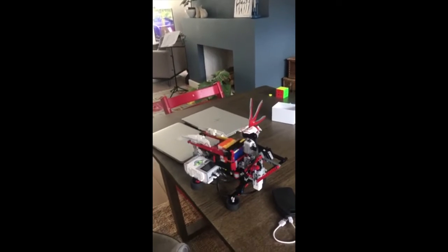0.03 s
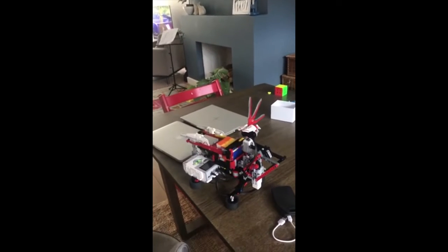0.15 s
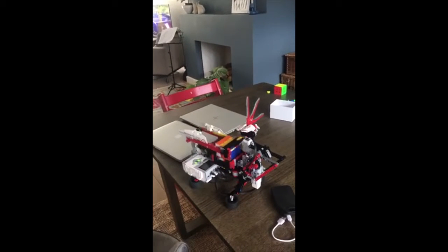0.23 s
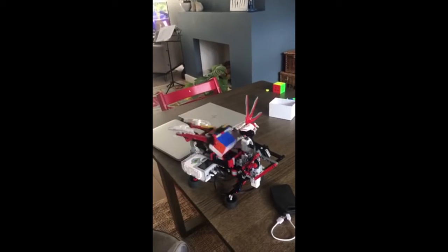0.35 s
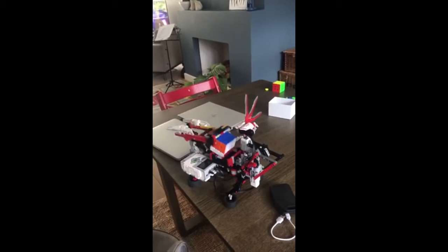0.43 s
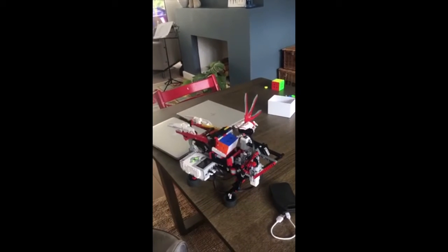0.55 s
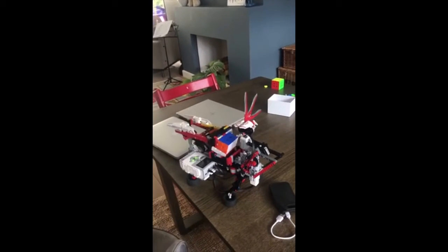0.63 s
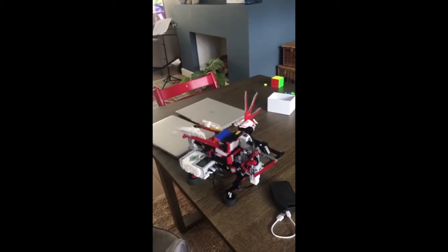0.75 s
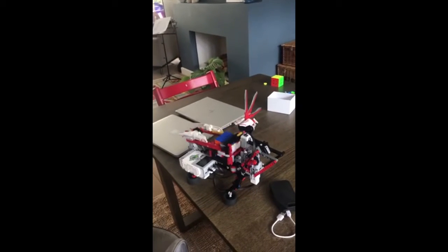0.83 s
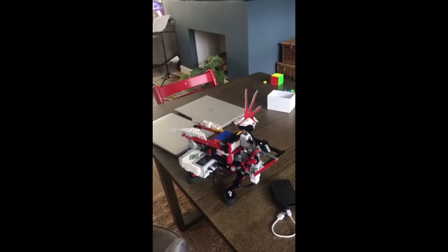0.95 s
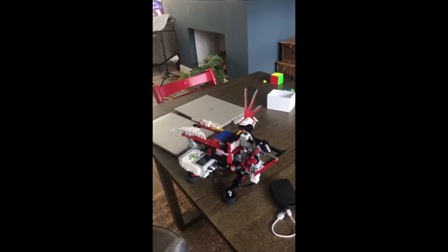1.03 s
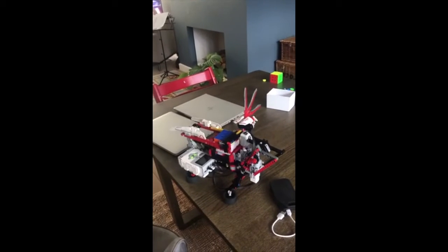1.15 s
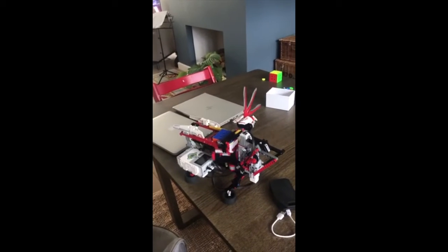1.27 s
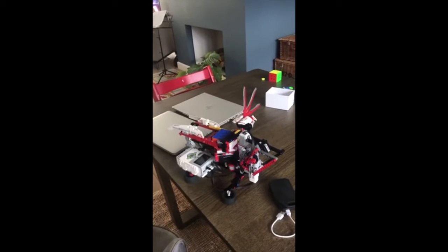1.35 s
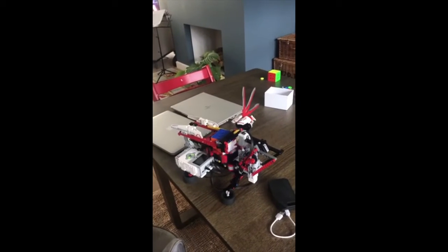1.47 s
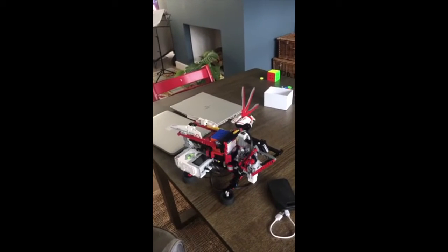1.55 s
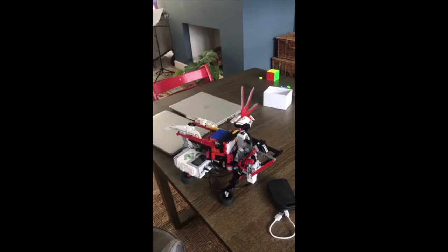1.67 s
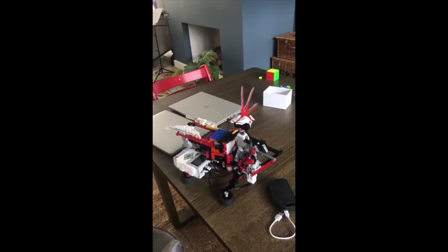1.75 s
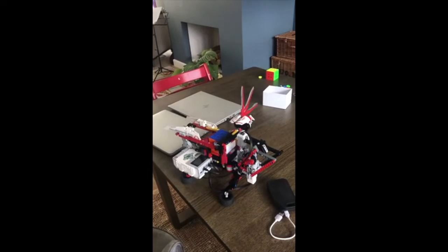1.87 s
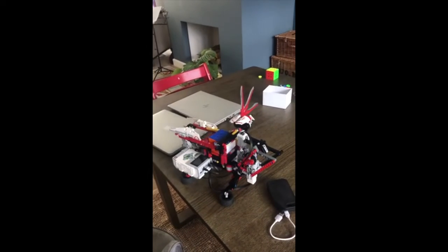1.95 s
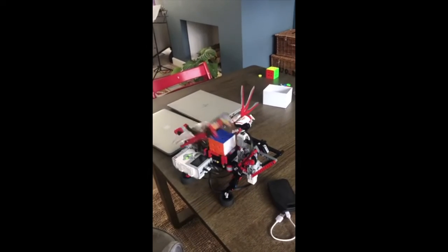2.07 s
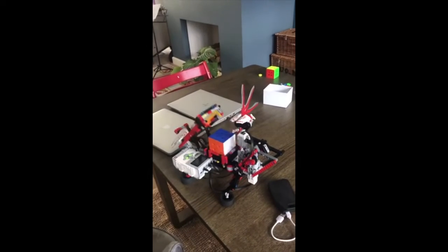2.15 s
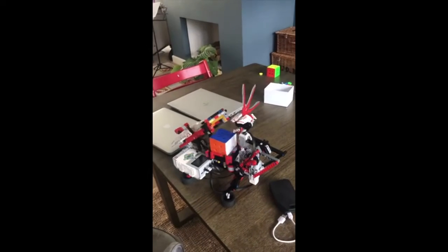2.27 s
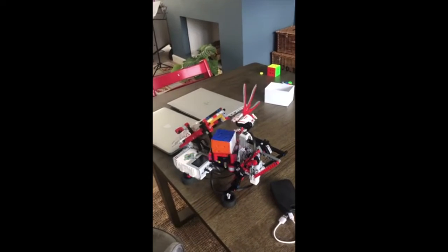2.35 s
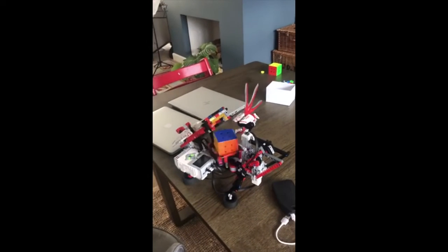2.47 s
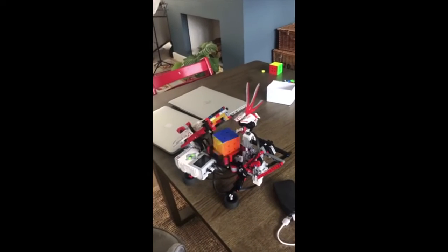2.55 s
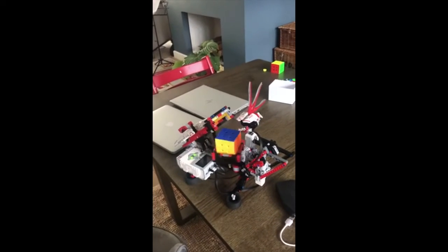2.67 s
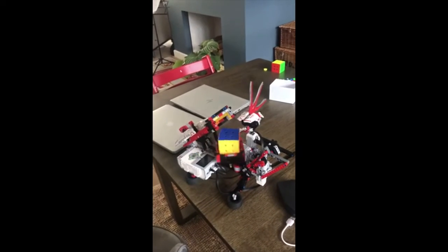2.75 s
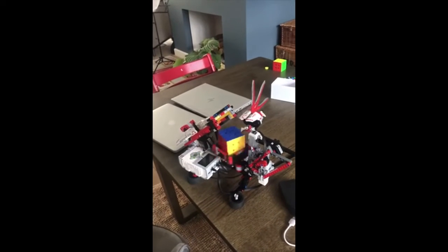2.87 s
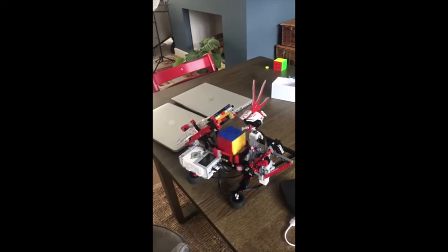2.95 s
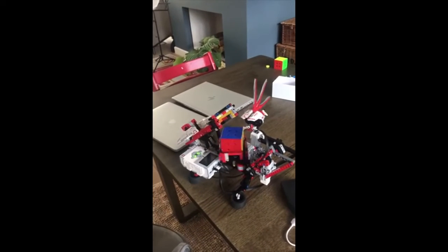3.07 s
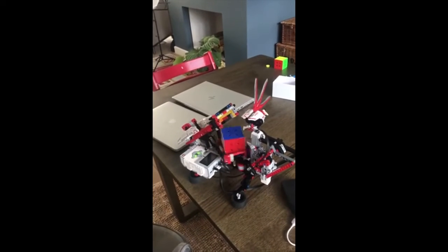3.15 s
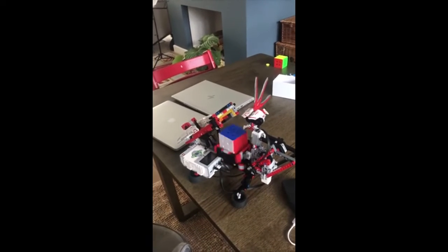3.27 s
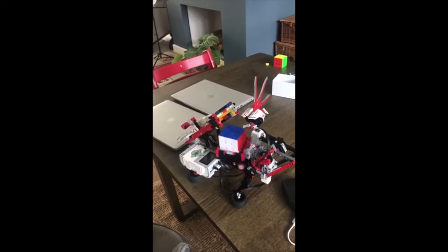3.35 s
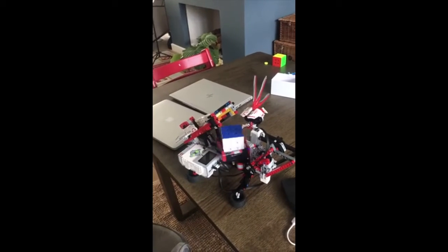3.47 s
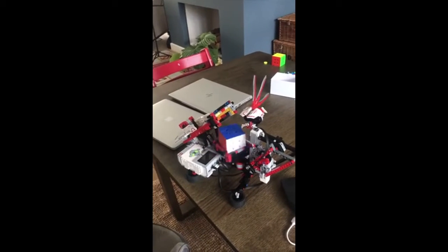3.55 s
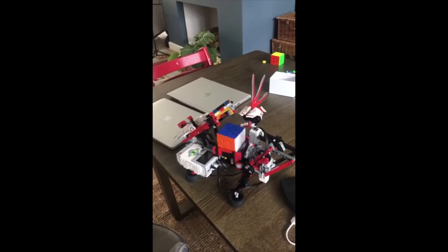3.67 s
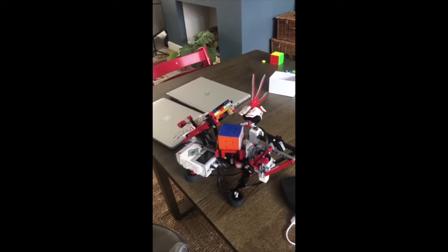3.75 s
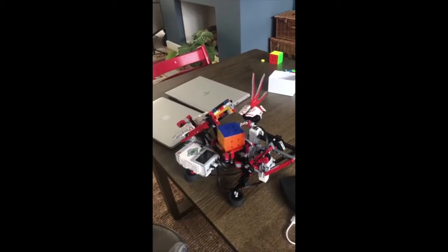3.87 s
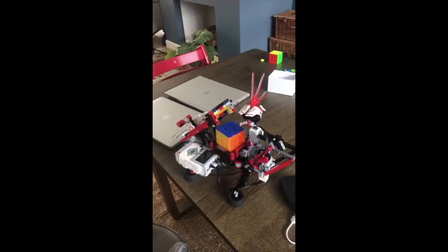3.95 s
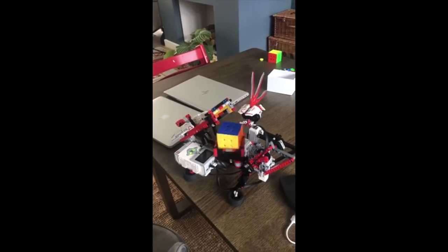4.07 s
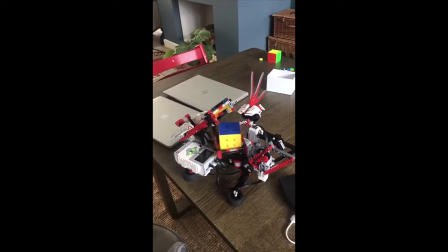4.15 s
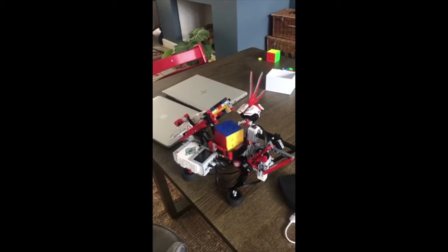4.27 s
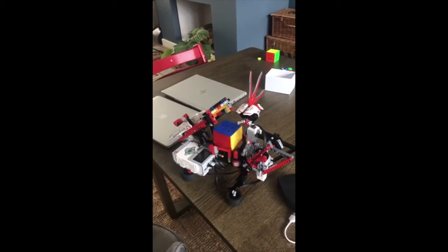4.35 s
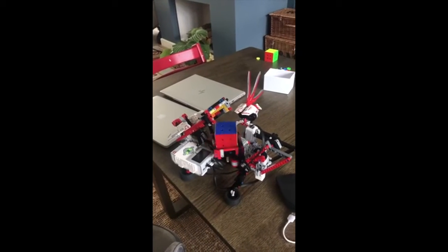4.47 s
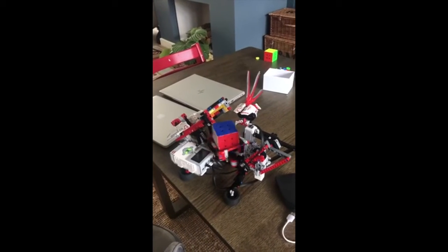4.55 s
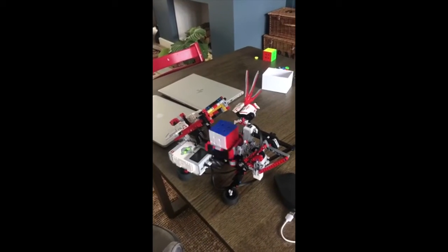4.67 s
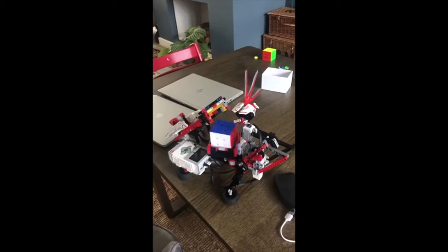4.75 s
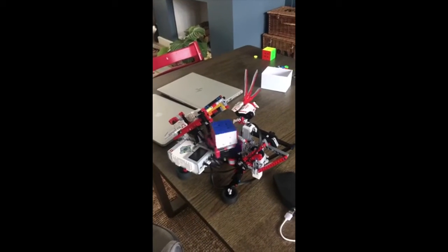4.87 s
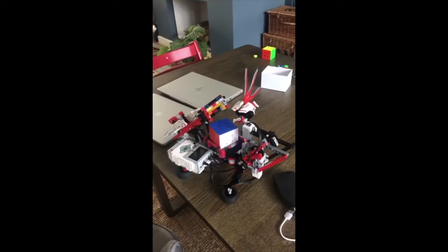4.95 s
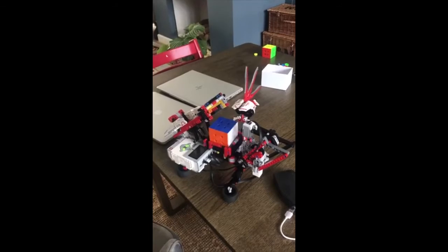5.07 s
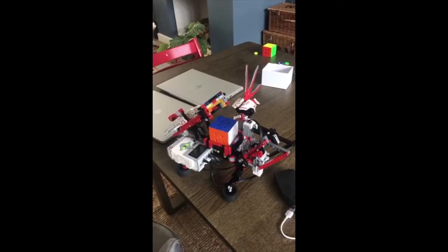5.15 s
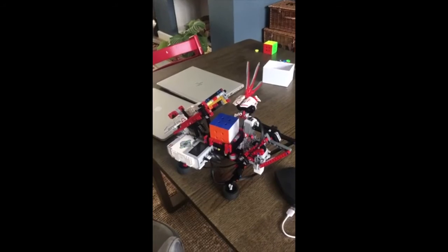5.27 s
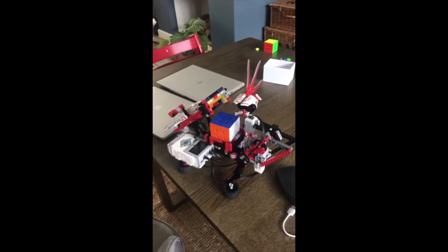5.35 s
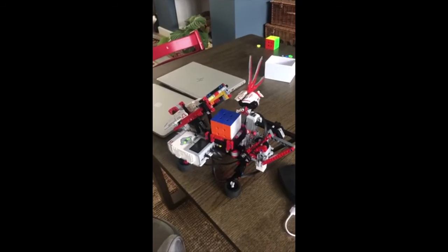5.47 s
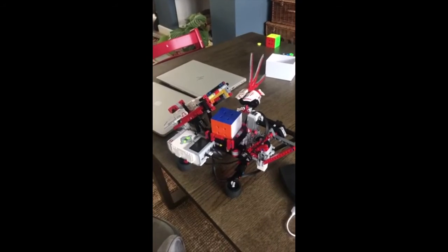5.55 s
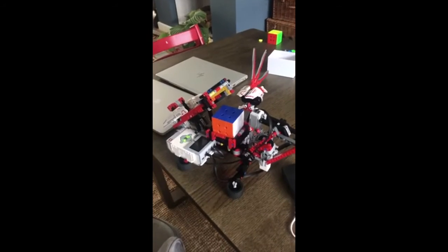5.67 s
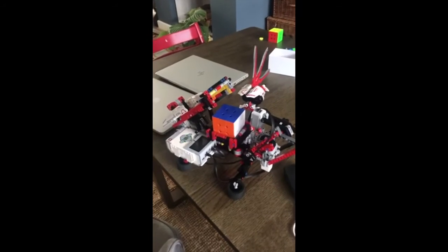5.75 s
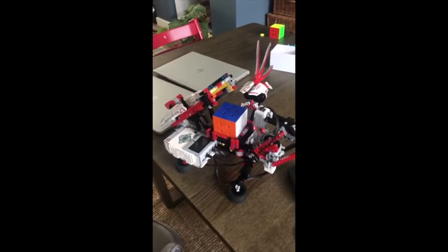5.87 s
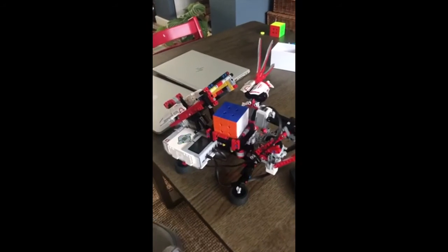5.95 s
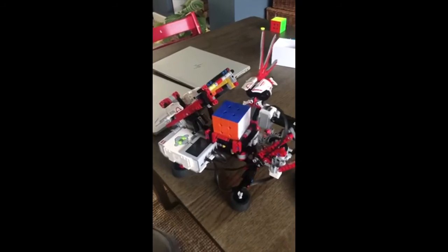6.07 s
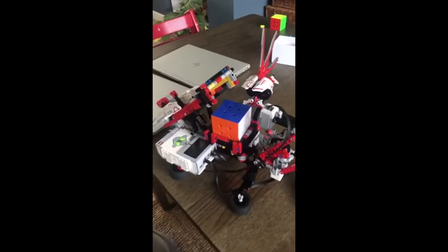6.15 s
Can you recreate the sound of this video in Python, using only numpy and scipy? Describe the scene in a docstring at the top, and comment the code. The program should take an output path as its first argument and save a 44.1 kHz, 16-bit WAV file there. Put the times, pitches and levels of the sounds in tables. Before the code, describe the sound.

Small geared motors grind and whine in bursts as plastic parts clack and rattle on a wooden table, then one steady whirring spin stops abruptly.

```python
"""Grinding arm strokes, plastic clicks and a booming table top open the scene, in which a small plastic
robot on a wooden table turns and flips a puzzle cube. A geared turntable motor then runs twice, first briefly
and then long: harmonics of its tooth rate and of its shaft rate sound over filtered grinding noise.
Clicks, knocks and rattles are decaying modes of plastic bodies, table booms are narrow noise bands under
jolt envelopes, and a quiet living room adds a diffuse echo and faint air noise."""
import sys
import numpy as np
from scipy import signal
from scipy.fft import rfft, irfft
from scipy.io import wavfile
from scipy.ndimage import uniform_filter1d

SR = 44100
rng = np.random.default_rng(int(sys.argv[2]) if len(sys.argv) > 2 else 0)


def inscribe(sig):
    """Save sig as 16-bit PCM at rate SR to the path in sys.argv[1].

    A 1-D sig is mono; a 2-D sig holds one channel per row.
    Samples are clipped to [-1, 1] before scaling.
    """
    pcm = np.round(np.clip(np.atleast_2d(sig).T, -1, 1) * 32767)
    wavfile.write(sys.argv[1], SR, pcm.astype(np.int16))


N = 274302
T = np.arange(N) / SR  # time in s

# Spectrum of the room air. Each row: frequency in Hz, relative level in dB.
ROOM_AIR = [(15, -34), (25, -4), (63, -1), (200, -8.5), (234, -9), (280, -8.5), (362, -10.5), (560, -17.5),
            (653, -15.5), (802, -16), (1450, -20.5), (1600, -22), (11600, -31.5), (15100, -67),
            (22000, -120)]
ROOM_AIR_DB = -68
# Echo: time to lose 60 dB, and level against the sound that feeds it.
ROOM_T60_S, ROOM_DB = 0.54, -6.5
TOP_HZ = 11690  # upper edge of the microphone

# Low and high mode of the table top. Each row: frequency in Hz, bandwidth in Hz.
TABLE_MODES = [(59, 20), (118, 16)]
# Jolts of the frame on the table. Each row: time in s, level of the low mode in dB, of the high mode in dB.
JOLTS = [(0.0, -36, -35), (0.045, -39, -36), (0.16, -40.5, -45.5), (0.29, -49, -55), (0.43, -60, -49.5),
         (0.59, -51, -53), (0.74, -53.5, -63), (0.86, -55.5, -52), (0.92, -64, -52), (0.99, -59, -48.5),
         (1.08, -52, -58.5), (1.2, -68, -58), (1.31, -66, -58.5), (2.01, -60, -63), (2.15, -68, -56),
         (2.28, -59, -55), (2.421, -57, -47), (2.57, -62, -57.5), (2.88, -58.5, -75), (3.81, -61.5, -65),
         (4.07, -64, -76)]
JOLT_RISE_DB_S, JOLT_FALL_DB_S = 237, 109
# Faint steady shaking: level of the low mode in dB, of the high mode in dB.
TREMBLE_DB = (-71, -77)
TREMBLE_ENDS_S, TREMBLE_FADE_DB_S = 4.46, 16
# Lowest ring of the frame: frequency in Hz, level in dB.
FRAME_MODE = (168.6, 8.5)
# Loose parts: mean ticks per s, level in dB at 0 dB of shaking, dB gained per dB of shaking.
RATTLE_PER_S, RATTLE_DB, RATTLE_SLOPE = 160., -24, 0.69

# The cube drops and rocks in its cradle. Each row: time in s, peak in dB, frequency of the blow's
# own extra ring in Hz, its level in dB, brightness in dB per octave.
KNOCKS = [(0.099, -42, 1440, -8, -2), (0.189, -50, 363, 17, -8), (0.321, -51, 1370, 5, 8),
          (0.498, -42.5, 1450, 5, 0.5), (0.601, -36, 1260, 3, 26), (0.821, -48, 312, 5, -2),
          (0.899, -39.5, 1284, -2, 6), (0.984, -35.5, 307, -20, -5), (1.077, -41, 798, 18, 2),
          (1.134, -37.5, 750, 16, -3), (1.155, -44, 797, 12, -2), (2.259, -47, 300, -3, -2),
          (2.34, -44, 1550, 9, 0.5), (2.899, -47.5, 1300, 9, 5), (5.883, -58.5, 330, 10, -14)]
# Modes of the cradle. Each row: frequency in Hz, relative level in dB.
CRADLE_MODES = [(240, -11.5), (310, 2.5), (420, 0), (560, 4.5), (760, -10.5), (960, 7.5), (1200, -1),
                (1450, -19)]
# Plastic striking plastic. Each row: time in s, peak in dB, frequency of the blow's own extra ring in Hz,
# its level in dB, brightness in dB per octave.
CLICKS = [(0.0324, -23, 5800, -2.5, 5), (0.053, -23, 6800, -2, 3), (0.0644, -27, 5280, -4, 10),
          (0.0775, -18.5, 6200, -13, 22), (0.09, -22, 5270, 7, 3), (0.1202, -32, 5170, 0, 0),
          (0.1825, -35.5, 2030, -7, -9), (0.3182, -28.5, 3840, -9, 11), (0.3522, -19.5, 3050, -1, -3.5),
          (0.419, -31, 3150, -1.5, 7), (0.4754, -38, 1600, -2.5, -4), (0.4898, -30.5, 4497, -4, -17),
          (0.5397, -21.5, 4000, -12, -2), (0.6778, -40.5, 3300, 0, -2), (0.838, -18, 2940, -3, 0),
          (0.8436, -20, 6040, 8, 9), (0.8946, -24, 5730, -0.5, 10), (0.8985, -21, 5330, 2, 1),
          (0.9015, -19.5, 5300, 1, -2), (0.9205, -34.5, 1952, 6, -16), (0.9791, -33, 1780, -10, 3),
          (1.0136, -37, 3130, 2, -10), (1.8473, -36, 4470, 9, 6), (1.8696, -42, 4600, 3, 3),
          (1.8871, -41, 6050, 1, 5), (2.094, -25, 4720, 5, 7), (2.3479, -19.5, 6360, 25, 32.5),
          (5.2008, -50, 3100, 2, -4), (5.3345, -60, 4300, 0, -5), (5.3714, -51, 3780, 6, -15),
          (5.776, -53.5, 6700, 21, 13)]
# Modes of the plastic parts. Each row: frequency in Hz, relative level in dB.
PLASTIC_MODES = [(1800, -21), (2300, -15.5), (2800, -7), (3500, -2), (4300, 0), (5000, -14), (5700, 8),
                 (6500, 0), (7600, -5.5), (9000, -4), (10500, -15)]
PLASTIC_CYCLES, CRADLE_CYCLES = 32, 13  # cycles until a ring has lost 60 dB
CLICK_CHATTER_S, KNOCK_CHATTER_S = 0.0012, 0.0042  # decay constants of the contact

# Arm motor strokes and nudges. Each row: start in s, hold in s, grind level in dB, its slope in dB per s,
# treble in dB and body in dB against the middle of the grind.
ARM_STROKES = [(-0.05, 0.094, -48.5, -2, 1.5, 3), (0.018, 0.1, -45, -40, 4.5, -1.5),
               (0.11, 0.08, -54, -10, -10, -1.5), (0.21, 0.12, -53, 0, -6, -10),
               (0.287, 0.15, -45, -10, -3.5, -13), (0.425, 0.09, -47, -17, -5, -8.5),
               (0.551, 0.05, -57, 0, 1.5, 3.5), (0.633, 0.068, -58, 5, -2.5, -7),
               (0.711, 0.13, -51.5, -2, 1.5, -4), (0.836, 0.074, -52, -22, 4, 0.5),
               (0.951, 0.066, -49.5, 2, -2, -7.5), (1.045, 0.16, -63, -10, 2, 0),
               (1.83, 0.11, -52, -10, 2.5, -5.5), (2.031, 0.16, -49.5, 9.5, -1, -12.5),
               (2.199, 0.075, -57, -52, -4, 0)]
# The arm motor sings under load. Each row: start in s, duration in s, initial tooth rate in Hz,
# tooth rate approached in Hz, levels in dB of five tooth-rate multiples.
ARM_WHINE = [(-0.01, 0.1, 692, 771.5, -57, -72, -57, -57, -66),
             (0.323, 0.087, 688, 822, -53.5, -52, -45.5, -51, -52),
             (0.423, 0.063, 795, 798, -55, -62, -66, -68, -66),
             (0.742, 0.04, 791, 731.3, -55, -61, -60, -66, -55),
             (1.886, 0.067, 724.3, 866, -55, -52, -71, -58, -72),
             (2.085, 0.05, 699, 806, -54, -61, -60, -66, -73),
             (2.128, 0.045, 788, 805.5, -51, -65, -46, -58, -58),
             (2.188, 0.061, 805, 805, -57.5, -74, -62, -68, -61)]
# The five multiples of the arm's tooth rate.
ARM_MULTIPLE = [2, 3, 4, 5, 7]
# Grind filter of the arm. Each row: frequency in Hz, relative level in dB.
ARM_CASE = [(120, -18), (200, -8.5), (454, -19), (660, -12.5), (1080, -12.5), (1580, -2.5), (1810, -2),
            (2370, -5), (2720, -6), (3230, 0), (3640, 0.5), (5570, -5), (7700, -12.5), (11200, -17.5),
            (11800, -13.5), (15300, -53), (22000, -120)]
ARM_ATTACK_S, ARM_RELEASE_DB_S = 0.047, 279
WHINE_ATTACK_S, WHINE_RELEASE_DB_S = 0.0055, 500
ARM_SPIN_S = 0.055  # time constant with which the rate nears its goal

TEETH = 10  # pinion teeth per shaft turn
# Turntable motor, one list a run. Each row: time in s, tooth rate in Hz, grind in dB before a fixed trim,
# treble in dB against the middle of the grind, whine in dB added to the tooth-rate multiples.
TURNTABLE = [
    [(1.19, 571.6, -67, -6, -25), (1.215, 588, -46.5, -19, -15), (1.25, 671, -51, 3, -14),
     (1.266, 731, -48.5, -2, 0.5), (1.296, 751, -45, -4, -3), (1.328, 855, -52.5, 3, 0.5),
     (1.36, 902, -47.5, 1, 0.5), (1.4, 952, -47, 1.5, 1), (1.464, 992, -47, -2.5, 0.5),
     (1.53, 1004, -46.5, -0.5, 0), (1.6, 1012, -47.5, 0, 0.5), (1.642, 1010, -48, -2.5, 2),
     (1.655, 933, -42, -9, -14), (1.685, 735, -50, -6, -16), (1.76, 690, -69, -7, -40)],
    [(2.31, 724, -57.5, -10, -23), (2.348, 738, -46, -2, -9), (2.372, 768, -46.5, 1, -6),
     (2.392, 833, -45.5, -1, -2), (2.42, 900.2, -50, 3, -3), (2.44, 934, -50, 6, -9),
     (2.47, 970, -50, 6, -1), (2.53, 1010, -48.5, 5, 2), (2.63, 1038, -49.5, 6.5, 1.5),
     (2.8, 1042, -48, 5, 2), (3.0, 1046, -48, 5, -0.5), (4.0, 1046, -48.5, 5, 0.5),
     (5.06, 1046, -48, 5.5, 1), (5.072, 1013, -48, 1, -5), (5.092, 765, -48, -1, 0),
     (5.11, 752, -54, -6, -30), (5.16, 700, -60.5, -5, -41)],
]
# Grind filter of the turntable. Each row: frequency in Hz, relative level in dB.
TURNTABLE_CASE = [(120, -42), (200, -30), (867, -26), (1050, -18), (1220, -26), (1330, -17), (1930, -16),
                  (2040, -6.5), (2630, -9), (3070, -3), (3400, -2.5), (4170, 1.5), (5380, -3), (6380, -5.5),
                  (11800, -10), (15300, -29), (22000, -120)]
# Resonant humps of that filter. Each row: centre in Hz, width in Hz, height in dB.
TURNTABLE_RINGS = [(4270, 110, 6), (6380, 1000, 6.5), (7360, 68, 7), (8470, 500, 10), (10030, 1900, 7.5),
                   (11300, 650, 13)]
# Body of the grind in dB against its middle, one value a run, before it yields to the whine.
TURNTABLE_BODY_DB = [-10, -10.5]
BODY_RISE = 0.34  # dB of body gained for each dB that the whine sinks
# Relative levels in dB of tooth-rate multiples 1 to 6, one list a run.
TOOTH_DB = [
    [-55.5, -51.5, -47, -46, -46.5, -44],
    [-57.5, -50.5, -49.5, -52.5, -53.5, -55.5],
]
UPPER_DB, UPPER_EDGE_HZ = -9, 6300  # multiples 7 to 9 against the sixth, and the edge above which they fade
# The case favours some pitches of the whine. Each row: frequency in Hz, gain in dB.
WHINE_CASE = [(700, -10), (900, -7), (1000, -0.5), (1450, 5.5), (1850, 3), (1990, -21), (2090, 1.5),
              (2300, -3), (2550, 1), (2720, -13), (2900, 2), (3130, -1), (3600, 6), (4000, 5), (4350, 8),
              (4800, -5), (5300, -7), (5700, -3), (6050, -3), (6300, -2)]
# Shaft-rate multiples sounded by uneven pinion teeth.
SHAFT_MULTIPLE = [1, 3, 5, 6, 7, 9, 11, 13, 15, 16, 17, 18, 19, 21, 23, 29, 31, 35, 39, 41, 43, 44, 61]
# Their levels in dB against the grind column, before a fixed trim, one list a run.
SHAFT_DB = [
    [-32, -32, -35, -29, -35, -25, -26, -26, -27, -26, -21, -13.5, -26, -13, -27, -10, -19, -26, -24, -21,
     -15, -8, -4],
    [-34, -26, -29, -24, -27, -17.5, -24.5, -20.5, -23, -16, -20, -18, -41, -16, -16, -13, -14, -31, -11,
     -21, -29, -22, -3.5],
]
# Slow swells of tooth-rate multiples 1 to 6. Each row: swing in dB, lead in periods.
SWELL = [(3, 0.11), (1.5, 0.35), (4, 0.17), (3.5, 0.072), (6, 0.1), (0, 0.1)]
SWELL_LEAN = 0.25  # swells build slowly and drop fast
# Speed sag: period, first corner, share of the speed, narrowing of the dip.
QUARTER_S, CORNER_S, SAG, SAG_PINCH = 0.462, 2.765, 0.0045, 0.3
JUDDER_S = 0.000004  # share of speed jitter added for each Hz per s of speed change


def undb(db):
    """Amplitude ratio is ten to the power of decibels over twenty."""
    return 10 ** (np.asarray(db) / 20)


def unit(x):
    """Normalization: division by the root mean square gives rms 1."""
    return x / np.sqrt(np.mean(x ** 2))


def butter(x, order, edge_hz, kind):
    """Causal Butterworth filter with a maximally flat passband."""
    return signal.sosfilt(signal.butter(order, edge_hz, kind, fs=SR, output="sos"), x)


def colour(x, points, rings=()):
    """Linear filtering multiplies the spectrum by a log-frequency curve with resonant humps."""
    hz = np.maximum(np.arange(N // 2 + 1) * SR / N, 1)
    point_hz, point_db = np.transpose(points)
    shape_db = np.interp(np.log(hz), np.log(point_hz), point_db)
    for centre, width, height_db in rings:
        shape_db = shape_db + height_db / (1 + (2 * (hz - centre) / width) ** 2)
    return irfft(rfft(x) * undb(shape_db), N)


def band(x, lo_hz, hi_hz):
    """Fourth-order band-pass: only components between two edges pass."""
    return butter(x, 2, [lo_hz, min(hi_hz, .45 * SR)], "band")


def walk(rate):
    """Smoothed random fluctuation: normal levels, rate per s, joined by slopes; spread near 0.8."""
    k = max(int(SR / rate), 1)
    return uniform_filter1d(np.repeat(rng.standard_normal(N // k + 1), k), k)[:N]


def read(table):
    """Linear interpolation of the columns, with a gate open while the table lasts."""
    s, *columns = np.transpose(table)
    start = s[0] if s[0] > 0 else -1
    edge_s = np.minimum(T - start, s[-1] - T)
    gate = np.sqrt(np.clip(edge_s / 0.013 + .5, 0, 1))
    return [np.interp(T, s, c) for c in columns], gate


def room_air():
    """Broadband background: shaped noise whose level drifts slightly."""
    return undb(ROOM_AIR_DB + .8 * walk(6.)) * unit(colour(rng.standard_normal(N), ROOM_AIR))


def room(x):
    """Diffuse reverberation: convolution with decaying noise whose treble decays faster."""
    t = np.arange(SR // 2) / SR
    noise = rng.standard_normal(len(t)) * np.clip(t / 0.013, 0, 1)
    soft = uniform_filter1d(noise, size=5)
    treble = noise - soft
    tail = soft * 1000. ** (-t / ROOM_T60_S) + treble * 1000. ** (-t / (0.74 * ROOM_T60_S))
    return undb(ROOM_DB) * signal.fftconvolve(x, tail / np.linalg.norm(tail))[:N]


def shake():
    """Damped excitation: table-mode levels in dB rise fast at each jolt and decay to a faint tremble."""
    s, *modes_db = np.transpose(JOLTS)
    age = T[::64] - s[:, None]  # every 64th sample suffices for an envelope
    shape_db = -np.maximum(JOLT_FALL_DB_S * age, -JOLT_RISE_DB_S * age)
    late_db = TREMBLE_FADE_DB_S * np.maximum(T - TREMBLE_ENDS_S, 0)
    levels = []
    for db, rest_db in zip(modes_db, TREMBLE_DB):
        jolt_db = np.repeat(np.max(db[:, None] + shape_db, axis=0), 64)[:N]
        levels.append(np.maximum(jolt_db, rest_db - late_db))
    return levels


def table_top():
    """Modal resonance: two narrow noise bands stand for table modes under the jolt envelopes."""
    boom = 0
    for db, (hz, width) in zip(shake(), TABLE_MODES):
        boom = boom + undb(db) * unit(band(rng.standard_normal(N), hz - width / 2, hz + width / 2))
    return boom


def rattle():
    """Random impacts: loose parts ring frame and cradle, their level following the high table mode."""
    shake_db = shake()[1]
    chance, height = rng.random((N, 2)).T
    ticks = (chance < RATTLE_PER_S / SR) * undb(-2.2 * np.log(height + 1e-9))
    t = np.arange(SR // 10) / SR
    ring = sum(undb(db) * np.sin(2 * np.pi * hz * t) * 1000. ** (-t * hz / CRADLE_CYCLES)
               for hz, db in [FRAME_MODE] + CRADLE_MODES)
    return undb(RATTLE_DB + RATTLE_SLOPE * shake_db) * unit(signal.fftconvolve(ticks, ring)[:N])


def strike(events, modes, cycles, scatter_db, chatter_s):
    """Modal impact: a brief noisy contact excites damped modes; each blow tilts them by its own brightness."""
    out, t = np.zeros(N + SR), np.arange(SR // 10) / SR
    for s, peak_db, own_hz, own_db, bright_db in events:
        ring = 0
        for hz, db in list(modes) + [(own_hz, own_db)]:
            level_chance, pitch_chance = rng.standard_normal(2)
            tilt_db = bright_db * np.log2(hz / modes[3][0])  # pivots on the fourth mode
            tone = np.sin(2 * np.pi * hz * (1 + 0.062 * pitch_chance) * t)
            ring = ring + undb(db + scatter_db * level_chance + tilt_db) * tone * 1000. ** (-t * hz / cycles)
        contact = rng.standard_normal(len(t)) * t * np.exp(-t / chatter_s)
        blow = signal.fftconvolve(ring, contact)[:len(t)]
        # small parts radiate little below their lowest mode
        blow = butter(blow, 4, 0.93 * modes[0][0], "high")
        i = int(s * SR)
        out[i:i + len(t)] += undb(peak_db) * blow / np.abs(blow).max()
    return out[:N]


def knocks():
    """Impact on the cradle: the cube excites low, heavily damped modes."""
    return strike(KNOCKS, CRADLE_MODES, CRADLE_CYCLES, 3.3, KNOCK_CHATTER_S)


def clicks():
    """Impact of plastic on plastic: a short contact excites high modes."""
    return strike(CLICKS, PLASTIC_MODES, PLASTIC_CYCLES, 3.2, CLICK_CHATTER_S)


def grind(shaft, case, rings, lo_hz, hi_hz, treble_db, body_db, beat, grit_db):
    """Scraping friction: gritty noise, modulated once a shaft turn, is filtered by the case."""
    grit = rng.standard_normal(N) * undb(grit_db * walk(1500.)) * (1 + beat * np.cos(shaft))
    hiss = colour(grit, case, rings)
    hiss = hiss / np.std(band(hiss, lo_hz, hi_hz))
    # zero-phase filters split off treble and body, which are set anew
    treble = signal.sosfiltfilt(signal.butter(2, 7000, "high", fs=SR, output="sos"), hiss)
    body = signal.sosfiltfilt(signal.butter(2, 1900, "low", fs=SR, output="sos"), hiss)
    middle = hiss - treble - body
    return middle + unit(treble) * undb(treble_db) + unit(body) * undb(body_db)


def stroke(start, db, slope, attack_s, hold, release_db_s):
    """Envelope: the gain of the loudest of several strokes that swell, hold and decay exponentially."""
    age = T - start[:, None]
    fade_db = release_db_s * np.maximum(age - hold[:, None], 0)
    attack = np.clip(age / attack_s, 0, 1) ** 2
    return np.max(attack * undb(db[:, None] + slope[:, None] * age - fade_db), axis=0)


def arm():
    """Gear meshing under short loads: a wavering harmonic whine half buried in grind."""
    start, hold, grind_db, slope, treble_db, body_db = np.transpose(ARM_STROKES)
    sings, lasts, from_hz, to_hz, *line_db = np.transpose(ARM_WHINE)
    now = np.searchsorted(sings, T) - 1  # the latest whine sets the rate
    hz = to_hz[now] + (from_hz - to_hz)[now] * np.exp(-(T - sings[now]) / ARM_SPIN_S)
    shaft = 2 * np.pi * np.cumsum(hz * (1 + 0.01735 * walk(150.))) / TEETH / SR
    whine = 0
    for k, db in zip(ARM_MULTIPLE, line_db):
        gain = stroke(sings, db, 0 * db, WHINE_ATTACK_S, lasts, WHINE_RELEASE_DB_S)
        whine = whine + gain * undb(4.45 * walk(90.)) * np.sin(k * TEETH * shaft)
    latest = np.searchsorted(start, T) - 1
    treble = uniform_filter1d(treble_db[latest], size=800)
    body = uniform_filter1d(body_db[latest], size=800)
    hiss = grind(shaft, ARM_CASE, (), 1300, 6800, treble, body, 0.057, 2.1)
    # every tooth kicks the scrape, which makes it buzz
    buzz = 1 + 0.43 * np.cos(TEETH * shaft)
    return whine + stroke(start, grind_db, slope, ARM_ATTACK_S, hold, ARM_RELEASE_DB_S) * hiss * buzz


def lean(angle):
    """Phase distortion: a cosine skewed to rise slowly and drop fast."""
    return np.cos(angle + SWELL_LEAN * (1 - np.cos(angle)))


def turntable():
    """Gear meshing: tooth-rate harmonics, shaft-rate side tones and grind share one shaft phase."""
    tones, noise = 0, 0
    corner = 2 * np.pi * (T - CORNER_S) / QUARTER_S
    loaded = np.clip((T - CORNER_S) / QUARTER_S + 1, 0, 1)
    case_hz, case_db = np.transpose(WHINE_CASE)
    for run, body_db, tooth_db, uneven_db in zip(TURNTABLE, TURNTABLE_BODY_DB, TOOTH_DB, SHAFT_DB):
        (hz, grind_db, treble_db, whine_db), gate = read(run)
        jitter = 0.002 + JUDDER_S * np.abs(np.gradient(hz)) * SR
        hz = hz * (1 - SAG * loaded * (np.cos(corner) + SAG_PINCH * np.cos(2 * corner)))
        shaft = 2 * np.pi * np.cumsum(hz * (1 + jitter * walk(60.))) / TEETH / SR
        whine = 0
        for k, (db, (swing_db, lead)) in enumerate(zip(tooth_db, SWELL), 1):
            swell_db = swing_db * loaded * lean(corner + 2 * np.pi * lead)
            line_db = db + whine_db + np.interp(k * hz, case_hz, case_db) + swell_db
            whine = whine + undb(line_db + 2.3 * walk(40.)) * np.sin(k * TEETH * shaft)
        for k in (7, 8, 9):  # levels follow the sixth multiple, the last of the loop above
            upper = undb(line_db + UPPER_DB) / (1 + (k * hz / UPPER_EDGE_HZ) ** 12)
            whine = whine + upper * np.sin(k * TEETH * shaft)
        # uneven teeth repeat once a shaft turn
        side = sum(undb(db + 2.4 * walk(12.)) * np.sin(k * shaft + k * k)
                   for k, db in zip(SHAFT_MULTIPLE, uneven_db))
        treble = treble_db + 0.75 * walk(12.)
        body = body_db - BODY_RISE * whine_db + 1.2 * walk(12.)
        hiss = grind(shaft, TURNTABLE_CASE, TURNTABLE_RINGS, 4400, 5730, treble, body, 0.16, 1.63)
        tones = tones + gate * (whine + undb(grind_db - 2.5) * side)
        noise = noise + gate * undb(grind_db - 1.67) * hiss
    return tones, noise


def scene():
    """Superposition of all sources, alike in two channels; the motor tones feed the echo weakly."""
    tones, hiss = turntable()
    clatter = hiss + arm() + clicks() + knocks() + rattle()
    echo = room(clatter + 0.3 * tones)
    return np.tile(tones + clatter + echo + table_top() + room_air(), (2, 1))


def record(dry):
    """Band limitation: the phone microphone drops the deepest bass and cuts the top steeply."""
    dry = butter(dry, 2, 30, "high")
    return signal.sosfilt(signal.ellip(16, .3, 80, TOP_HZ, fs=SR, output="sos"), dry)


dry = scene()
out = record(dry)
inscribe(out)
```